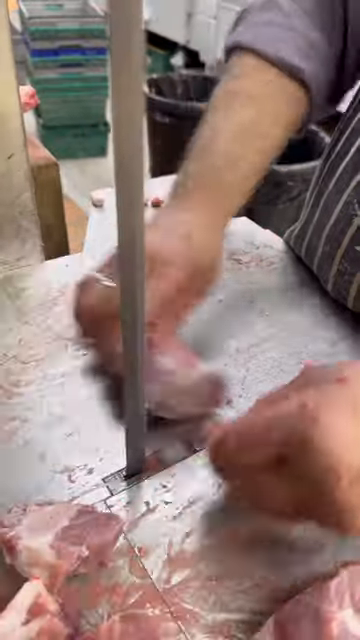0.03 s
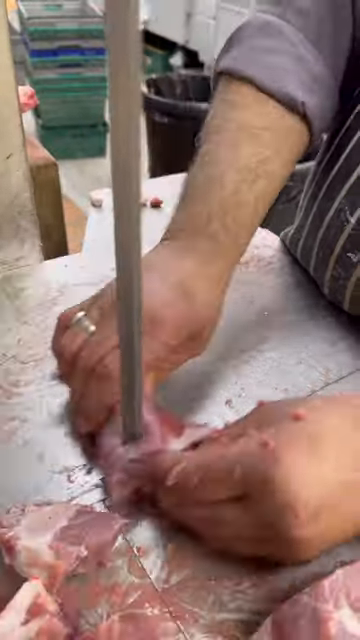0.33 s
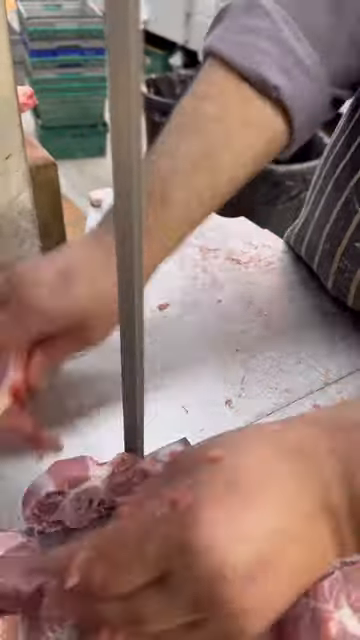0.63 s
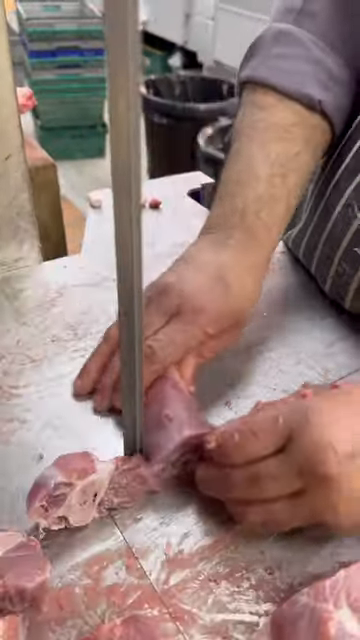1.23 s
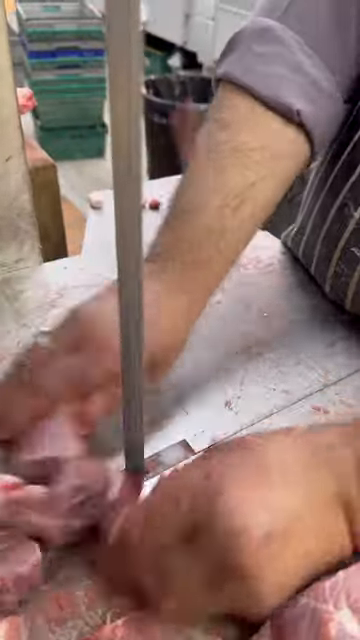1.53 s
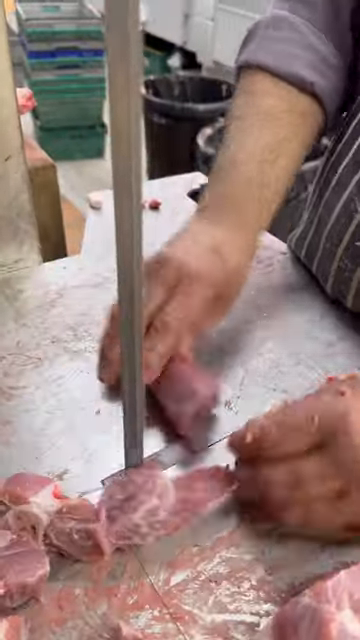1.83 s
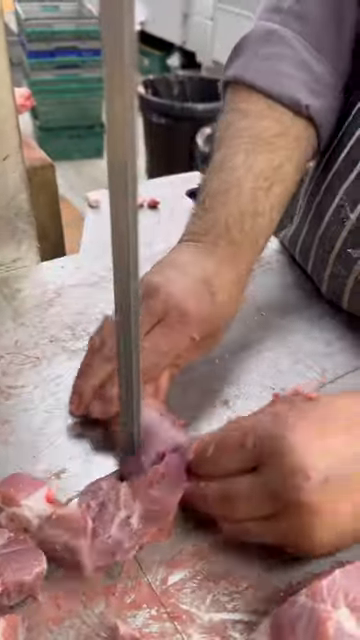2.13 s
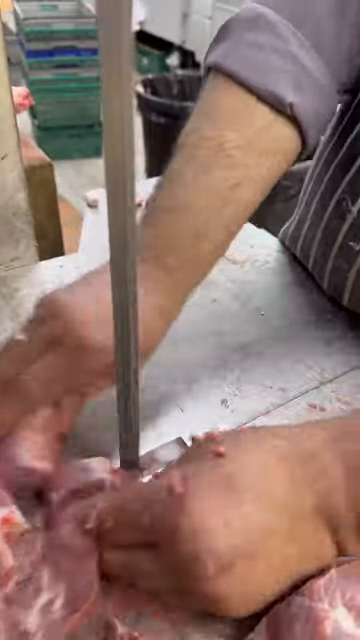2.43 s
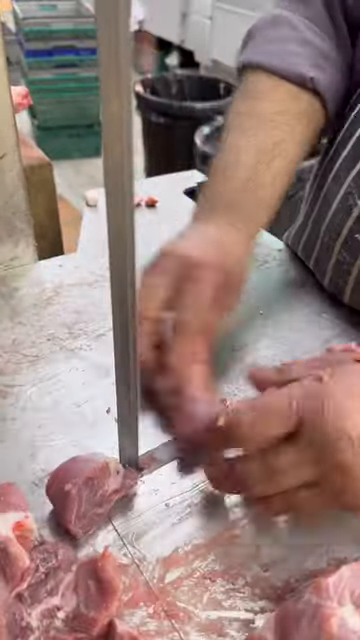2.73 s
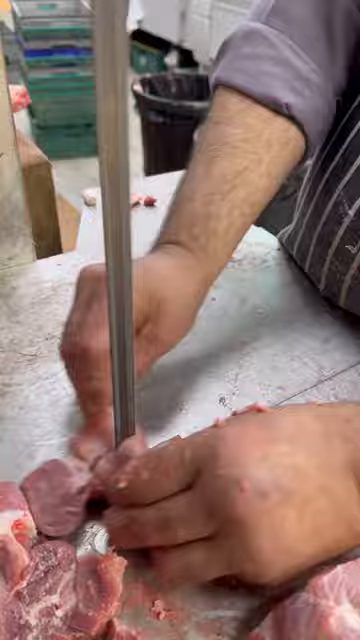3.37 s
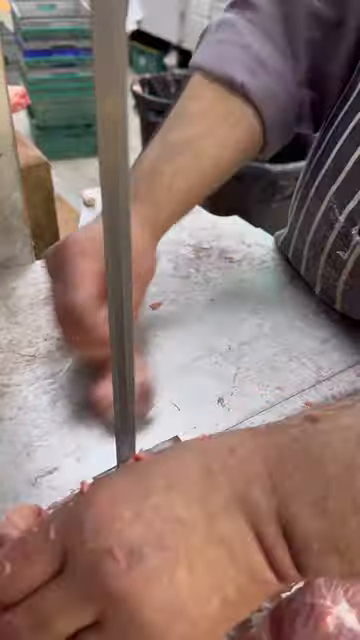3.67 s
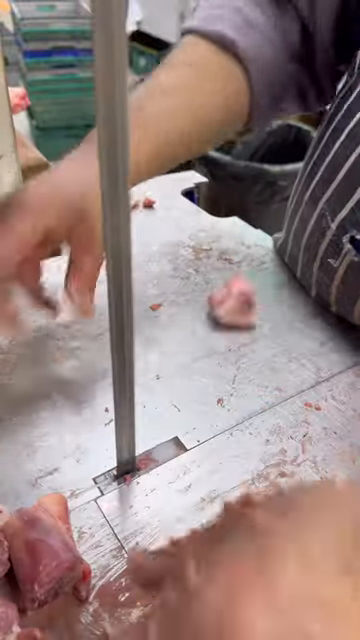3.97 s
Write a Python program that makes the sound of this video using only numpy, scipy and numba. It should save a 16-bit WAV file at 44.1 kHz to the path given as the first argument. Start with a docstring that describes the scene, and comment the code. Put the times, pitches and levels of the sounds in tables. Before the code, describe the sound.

A bandsaw hums and hisses, rasping and whining through meat and bone four times.

```python
"""Butcher's bandsaw in a small hard-walled shop.

Close by, the motor hums on multiples of its shaft rate and the band hisses through its guides.
Four times a joint of meat is pushed through: the teeth rasp and whine on the bone, and the first three
cuts leave the blade ringing. During the last comes a quick run of low thuds, and a limiter ducks."""
import sys
import numpy as np
from scipy import signal
from scipy.fft import rfft, irfft
from scipy.io import wavfile
from numba import njit

SR = 44100
rng = np.random.default_rng(int(sys.argv[2]) if len(sys.argv) > 2 else 0)


def dump_mix(stems):
    """Bounce the given channels to the path in sys.argv[1] as a 16-bit WAV at rate SR."""
    frames = np.atleast_2d(stems).T  # one column per channel
    limited = np.clip(frames, -1, 1)  # hard clip at full scale
    pcm = np.round(limited * 32767).astype(np.int16)
    wavfile.write(sys.argv[1], SR, pcm)


N = 176400
T = np.arange(N) / SR
BIN_HZ = np.arange(N // 2 + 1) * SR / N
SHAFT_HZ = 24.9


def undb(db):
    """Decibels to gain."""
    return 10 ** (np.asarray(db) / 20)


def unit(x):
    """Scale to an rms of 1."""
    return x / np.sqrt(np.mean(x ** 2) + 1e-20)


def noise():
    """White noise."""
    return rng.standard_normal(N)


def shape(x, points):
    """Filter by a curve of (Hz, dB) points."""
    hz, db = np.array(points, float).T
    gain_db = np.interp(np.log(np.maximum(BIN_HZ, 1)), np.log(hz), db)
    return irfft(rfft(x) * undb(gain_db), N)


def resonate(x, peaks):
    """Filter by resonances given as (Hz, width Hz, dB)."""
    power = sum(undb(db) ** 2 / (1 + (2 * (BIN_HZ - hz) / width) ** 2) ** 2 for hz, width, db in peaks)
    return irfft(rfft(x) * np.sqrt(power), N)


def drift(hz):
    """Smooth random motion of rms 1 and bandwidth hz."""
    return unit(irfft(rfft(noise()) * np.exp(-(BIN_HZ / hz) ** 2) * (BIN_HZ > 0), N))


def gate(start, end, edge):
    """Window with sloping edges."""
    return np.clip(np.minimum(T - start, end - T) / edge + .5, 0, 1)


def curve(rows, column=1):
    """Gain from a column of dB over time."""
    rows = np.array(rows, float)
    return undb(np.interp(T, rows[:, 0], rows[:, column]))


def fade(start, decay_s):
    """Exponential decay after a blow."""
    return (T >= start) * np.exp(-np.maximum(T - start, 0) / decay_s)


def tooth_tone(tooth_hz, multiple, rough_db, wobble=0):
    """Rough tone on a multiple of the tooth rate."""
    cycles = multiple * np.cumsum(tooth_hz * (1 + wobble * drift(200))) / SR
    roughness = undb(rough_db * drift(141) + 2.75 * drift(930))
    return unit(roughness * np.sin(2 * np.pi * (cycles + rng.random())))


# Spectra of the teeth's rasp, its top octave and the grind in bone. Each row: frequency in Hz, gain in dB.
RASP_EQ = [(1290, -45), (2200, -19), (3050, -9.5), (3620, -3.5), (4470, -14.5), (4990, -10), (5410, -9.5),
           (6430, -9), (7190, -3), (8130, -7), (8700, -4), (8970, -6), (9600, -5.5), (12500, -29),
           (21100, -120)]
SIZZLE_EQ = [(6000,-53),(9500,-20),(13200,-11),(14000,-7),(14700,12),(15200,6),(16000,-7.5)]
GRIND_EQ = [(40,-4),(110,5),(300,-8.5),(750,2),(1000,-3),(1400,-1.5),(1800,9.5),(2400,1),(3200,-6),(4600,1),(6100,10),(7500,-8),(10000,-33)]


def tooth_noise(tooth_hz, decay_teeth=.42, scatter_db=2):
    """Each tooth tears off a burst of noise. Returns rasp and grind."""
    teeth = np.cumsum(tooth_hz) / SR
    strength = undb(scatter_db * noise()[teeth.astype(int)] + 1.83 * drift(90))
    bursts = strength * np.exp(-(teeth % 1) / decay_teeth)
    rasp = undb(8.5) * unit(shape(bursts * noise(), RASP_EQ))
    sizzle = undb(5.5) * unit(shape(bursts * noise(), SIZZLE_EQ))
    grind = undb(5.5) * unit(shape(bursts * noise(), GRIND_EQ))
    return rasp + sizzle, grind


# Each row: start in seconds, length in seconds, multiple of the tooth rate, level in dB.
SQUEALS = [(0.314,0.045,5,-21.5),(.381,0.034,5,-21),(0.395,0.026,3,-20),(1.243,0.084,4,-27.5),(1.335,.11,4,-24.5),(1.39,0.03,3,-36),(2.112,0.15,4,-24),(2.212,0.13,4,-25),(2.279,0.025,5,-25),(3.19,0.078,4,-19.5),(3.301,0.026,4,-18)]


def blade_squeals(tooth_hz, edge_s=.0088):
    """The blade locks onto one multiple of the tooth rate and wavers."""
    return sum(undb(db) * gate(s, s + length, edge_s) * tooth_tone(tooth_hz, k, rough_db=4.5, wobble=.008)
               for s, length, k, db in SQUEALS)


# One table per cut. Each row: time in seconds, rasp in dB, whine in dB, bite into the bone in dB.
CUT_1 = [(0.24, -53, -57, -63), (0.272, -33.5, -44, -60), (0.314, -37, -29.5, -40.5),
         (0.344, -36, -41, -33), (0.368, -38.5, -36, -41.5), (0.39, -30, -30, -33), (0.43, -40, -32, -30),
         (0.45, -48, -37, -47), (0.488, -41.5, -58, -70), (0.514, -46, -30.5, -59), (0.55, -68, -67, -66)]
CUT_2 = [(1.225, -83, -61, -51), (1.251, -32.5, -57, -37.5), (1.283, -42, -24, -43),
         (1.323, -36.5, -31, -69), (1.351, -38, -27, -34.5), (1.383, -30.5, -27, -35),
         (1.403, -36, -20, -31), (1.429, -28.5, -24, -28), (1.467, -45, -24, -36.5), (1.5, -73, -57, -66)]
CUT_3 = [(2.095, -76, -57, -55), (2.113, -30, -44, -49), (2.141, -40, -28.5, -56),
         (2.233, -32.5, -29, -32.5), (2.245, -35, -34, -29), (2.279, -29, -23.5, -28.5),
         (2.295, -28.5, -20, -29.5), (2.329, -39, -25, -30), (2.345, -43, -52, -43), (2.361, -47, -30, -60),
         (2.39, -57, -64, -55)]
CUT_4 = [(3.155, -58, -55, -64), (3.173, -41, -29.5, -35.5), (3.213, -27, -35, -49), (3.231, -32, -26, -27),
         (3.255, -34.5, -29, -36.5), (3.289, -35, -28, -32), (3.307, -37, -20, -36),
         (3.323, -32, -28.5, -34), (3.391, -31, -25, -31), (3.41, -57, -41, -68)]
# Each row: multiple of the tooth rate, level in dB relative to the cut's whine or bite.
WHINE_TONES = [(2,-0.5),(4,-6)]
BITE_TONES = [(1,-2),(3,1.5),(5,-2)]
TOOTH_HZ, SAG_HZ_PER_S, CUT_EDGE_S = 1851, 115, .01


def cutting():
    """The teeth rasp, whine and bite into the bone; the band slows during each cut."""
    cuts = [(cut, gate(cut[0][0], cut[-1][0], CUT_EDGE_S)) for cut in (CUT_1, CUT_2, CUT_3, CUT_4)]
    rasp_gain, whine_gain, bite_gain = (sum(curve(cut, k) * on for cut, on in cuts) for k in (1, 2, 3))
    in_cut_s = sum((T - cut[0][0]) * on for cut, on in cuts)
    jitter = 1 + .008 * drift(250) + .003 * drift(50)
    tooth_hz = (TOOTH_HZ - SAG_HZ_PER_S * in_cut_s) * jitter
    rasp, grind = tooth_noise(tooth_hz)
    squeals = blade_squeals(tooth_hz)
    whine = sum(undb(db) * tooth_tone(tooth_hz, k, rough_db=5) for k, db in WHINE_TONES)
    bite = grind + sum(undb(db) * tooth_tone(tooth_hz, k, rough_db=3) for k, db in BITE_TONES)
    return rasp_gain * rasp + whine_gain * whine + bite_gain * bite + squeals


# Each row: start in seconds, length in seconds, first pitch in Hz, last pitch in Hz, level in dB.
CHIRPS = [(0.277,0.036,4150,3760,-32),(1.263,0.013,3620,3170,-25),(2.133,0.0065,3950,3760,-16.5),(2.148,0.024,3770,3620,-33),(3.17,0.0074,3590,3260,-31),(3.203,0.016,3610,3190,-22)]


def tooth_chirps(jitter=.019, edge_s=.005):
    """Rough falling squeaks as the teeth first catch the bone."""
    out = 0
    for s, length, first_hz, last_hz, db in CHIRPS:
        hz = np.interp(T, [s, s + length], [first_hz, last_hz]) * (1 + jitter * drift(505))
        envelope = undb(db + 4.7 * drift(270)) * gate(s, s + length, edge_s)
        out += envelope * np.sin(2 * np.pi * np.cumsum(hz) / SR)
    return out


# Each row: start in seconds, level in dB, first pitch in Hz, relative level of grit and knock in dB.
THUDS = [(3.277,-4,780,-4),(3.291,-9,574,10),(3.305,1.5,430,-1.5),(3.318,-4.5,325,-11.5),(3.333,-2.5,286,-6),(3.349,0.5,146,-20),(3.366,6,136,-19)]
# Each row: frequency in Hz, gain in dB.
GRIT_EQ = [(25,-14),(80,3),(300,5.5),(600,-4.5),(1100,-3),(1600,-12.5),(2400,-22),(6000,-62)]
THUD_END_HZ, THUD_FALL_S, THUD_DECAY_S, KNOCK_HZ = 79, .00677, .012, 480


def low_thuds():
    """A quick run of low, sputtering thuds that fall in pitch, each with a hollow knock."""
    grit = unit(shape(noise(), GRIT_EQ))
    out = 0
    for s, db, first_hz, crunch_db in THUDS:
        envelope = fade(s, THUD_DECAY_S)
        hz = THUD_END_HZ * (T >= s) + (first_hz - THUD_END_HZ) * fade(s, THUD_FALL_S)
        thump = envelope * np.sin(2 * np.pi * np.cumsum(hz) / SR)
        knock = undb(-1.5) * fade(s, decay_s=.0044) * np.sin(2 * np.pi * KNOCK_HZ * (T - s))
        crunch = undb(crunch_db) * (envelope * grit - knock)
        out += undb(db) * (crunch - thump)
    return shape(out, [(20, -7), (65, -3.5), (1500, -7.5), (5000, 4.5)])


# Each row: start in seconds, level in dB.
TICKS = [(0.977,-24),(2.116,-7.5),(3.175,-16),(3.845,-25)]


def bone_ticks():
    """Sharp ticks of bone on steel."""
    crack_eq = [(500, -27), (3000, 4), (6000, -8), (8500, 1.5), (12000, 35), (15000, -36)]
    return unit(shape(noise(), crack_eq)) * sum(undb(db) * fade(s, decay_s=.011) for s, db in TICKS)


# The bone lets go of the blade. Each row: time in seconds, level in dB.
RELEASES = [(.42,-30.5),(1.442,-40),(2.32,-41)]
# Blade mode frequencies in Hz.
MODE_HZ = [1717, 1814, 1863, 2013]
# One row per mode. Each row: level in dB, T60 in seconds.
MODE_RING = [(3,0.88),(-5,0.43),(-2,0.83),(-15,0.15)]


def blade_ring():
    """The freed blade rings on in its modes."""
    return sum(undb(db + mode_db) * fade(s, t60 / np.log(1000)) * np.sin(2 * np.pi * hz * (T - s))
               for s, db in RELEASES for hz, (mode_db, t60) in zip(MODE_HZ, MODE_RING))


# Spectra of the band's hiss, its top octave and its rattle. Each row: frequency in Hz, gain in dB.
HISS_EQ = [(190, -17), (330, -12), (489, -11.5), (555, -7), (676, -27), (746, 1.5), (846, -10), (1120, -8),
           (1290, -6.5), (2000, 1.5), (2170, -7), (2330, -5.5), (3860, -8), (6060, -5.5), (9500, -10.5),
           (12400, -88), (20900, -120)]
AIR_EQ = [(6000,-40),(9500,-13),(13000,-30),(14500,-3.5),(16000,1.5)]
RATTLE_EQ = [(250,-16),(400,-1.5),(730,16.5),(850,-15),(1150,15.5),(1500,-1),(2400,4),(4000,-36),(8000,-41)]
# Resonances of guides and saw table. Each row: centre in Hz, width in Hz, gain in dB.
GUIDE_MODES = [(1149, 28, 4.5), (1378, 13, -3), (1981, 17, 11), (2383, 62, 4), (2864, 22, 5),
               (3228, 81, -1.5), (3525, 93, -1.5), (4196, 23, 1.5), (4770, 48, 4), (5317, 200, 1),
               (5930, 200, -7.5), (6120, 850, -1.5), (7080, 35, 5.5), (7670, 67, -0.5)]
# Each row: time in seconds, level in dB.
BAND_LEVEL = [(0,-37.5),(.1,-37.5),(.7,-39),(1.0,-38),(2.0,-36),(3.1,-37.5),(3.6,-36.5),(4,-37.5)]


def running_band(turns):
    """The band rubs through its guides; a rattle repeats with each shaft turn."""
    rub = undb(drift(40) + .73 * np.sin(2 * np.pi * turns))
    one_turn = noise()[:int(SR / SHAFT_HZ)]
    looped = np.interp(turns % 1, np.linspace(0, 1, len(one_turn)), one_turn)
    rattle = undb(-11.5) * unit(shape(looped * undb(6.9 * drift(21)), RATTLE_EQ))
    hiss = unit(shape(noise() * rub, HISS_EQ))
    guides = undb(-1.5) * unit(resonate(noise() * rub, GUIDE_MODES))
    air = undb(-2) * unit(shape(noise() * rub, AIR_EQ))
    return curve(BAND_LEVEL) * (hiss + guides + rattle + air)


# Each row: multiple of the shaft rate, relative level in dB.
HUM_TONES = [(1, -27), (2, -19.5), (3, -9.5), (4, -2.5), (5, -0.5), (6, -11), (7, 2.5), (8, -55.5),
             (9, -6.5), (10, -24.5), (11, -1.5), (12, -20), (13, -52), (14, -40), (15, -15), (16, -17),
             (17, -11), (18, -24), (19, -14), (20, -20), (21, -20), (22, -12), (23, -13.5), (24, -22),
             (25, -11.5), (26, -36.5), (27, -53), (28, -29.5), (29, -10), (30, -17)]
DRIVE_WHINE = [(36,-14.5),(43,-18.5),(46,-22.5),(57,-9)]
# Each row: frequency in Hz, gain in dB.
RUMBLE_EQ = [(20,-55),(45,-5),(90,7),(140,6.5),(280,3),(400,-12),(900,-75)]
# Each row: time in seconds, level in dB.
MOTOR_LEVEL = [(0,-47),(.3,-46.5),(.64,-39.5),(.8,-36.5),(1.55,-34),(2.6,-35),(3.71,-34.5),(3.75,-46),(4,-46.5)]


def motor(turns, waver_db=1.5):
    """Wavering multiples of the shaft rate over the rumble of the cabinet."""
    hum = sum(undb(db + waver_db * drift(1)) * np.sin(2 * np.pi * (k * turns + rng.random()))
              for k, db in list(HUM_TONES) + list(DRIVE_WHINE))
    rumble = shape(noise(), RUMBLE_EQ)
    return curve(MOTOR_LEVEL) * (undb(-.5) * unit(hum) + undb(-6) * unit(rumble))


# Stereo width of the cuts and of the running saw. Each row: frequency in Hz, side over mid in dB.
CUT_WIDTH = [(60,-41),(120,-24),(250,-20),(500,-13),(1100,-26),(2000,-28),(2600,1),(3700,-9.5),(4500,-1.5),(5500,-6),(7300,-3),(9200,7),(15000,9)]
MACHINE_WIDTH = [(60,-29),(200,-24.5),(380,-16.5),(700,-6.5),(1290,-6),(2000,-21.5),(2600,5),(3700,-4.5),(5500,-9),(8100,2),(15000,12)]


def shop_stereo(cuts, machine, reflected, t60_s=.065, diffuse_gain=.36):
    """Left and right hear the cuts out of step; the running saw arrives from all round."""
    walls = noise() * fade(0, t60_s / np.log(1000))
    diffuse = signal.fftconvolve(cuts, walls / np.sqrt(np.sum(walls ** 2)))[:N]
    quadrature = signal.hilbert(cuts).imag
    cut_side = np.sqrt(1 - diffuse_gain ** 2) * quadrature + diffuse_gain * diffuse
    side = shape(cut_side, CUT_WIDTH) + shape(reflected, MACHINE_WIDTH)
    mid = cuts + machine
    return np.array([mid + side, mid - side])


def scene():
    """Four cuts over the running saw."""
    turns = np.cumsum(SHAFT_HZ * (1 + .00097 * drift(1.53))) / SR
    machine, reflected = (motor(turns) + running_band(turns) for _ in range(2))
    cuts = cutting() + tooth_chirps() + blade_ring() + low_thuds() + bone_ticks()
    return shop_stereo(cuts, machine, reflected)


@njit
def follow(x, attack, release):
    """Envelope that rises fast and falls slowly."""
    out, level = np.empty(len(x)), 0.
    for i in range(len(x)):
        level += (x[i] - level) * (attack if x[i] > level else release)
        out[i] = level
    return out


# Each row: frequency in Hz, gain in dB.
MICROPHONE_EQ = [(20,-1.5),(9500,-2.5),(10300,-16),(12000,-36),(13500,-3),(14300,2),(16000,-24)]
LIMIT_DB, ATTACK_S, RELEASE_S, LOWPASS_HZ = -11.5, .0032, .19, 16000


def record(dry):
    """Microphone colour, a limiter that ducks after the loudest peaks, and a steep low-pass."""
    x = np.array([shape(channel, MICROPHONE_EQ) for channel in dry])
    envelope = follow(np.abs(x.mean(axis=0)), 1 / (ATTACK_S * SR), 1 / (RELEASE_S * SR))
    gain = np.minimum(1, undb(LIMIT_DB) / (envelope + 1e-9))
    lowpass = signal.ellip(10, .2, 80, LOWPASS_HZ, fs=SR, output="sos")
    return signal.sosfilt(lowpass, x * gain)


dry = scene()
out = record(dry)
dump_mix(out)
```